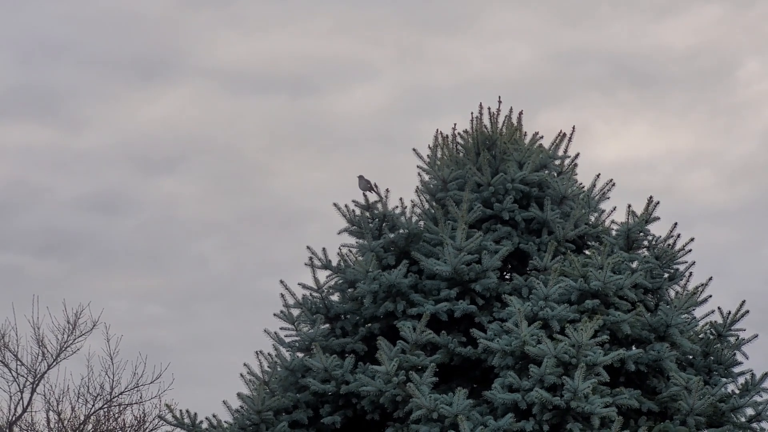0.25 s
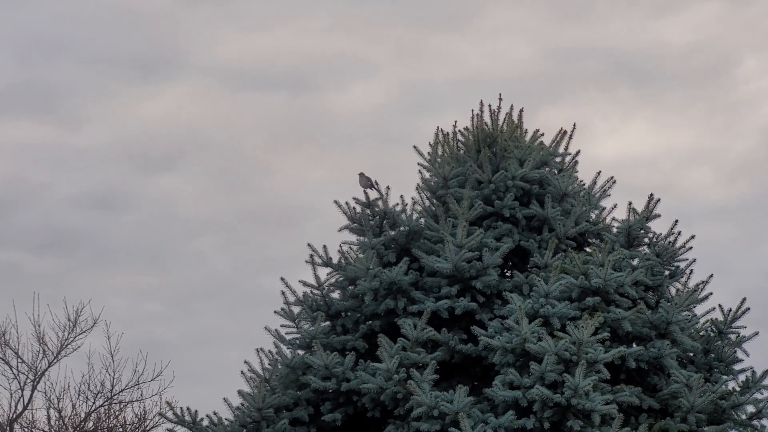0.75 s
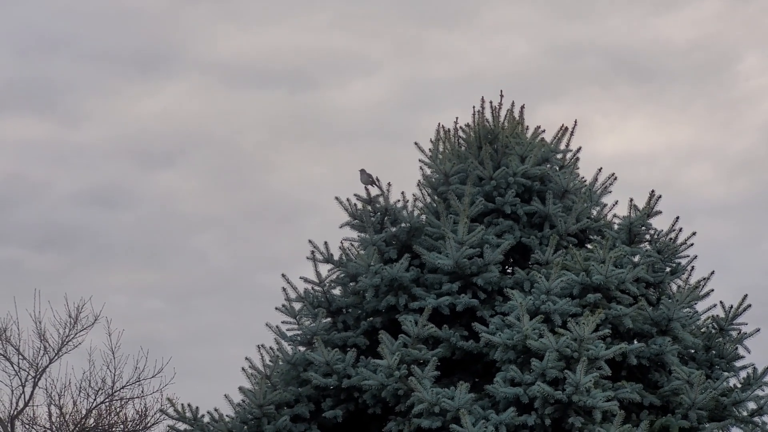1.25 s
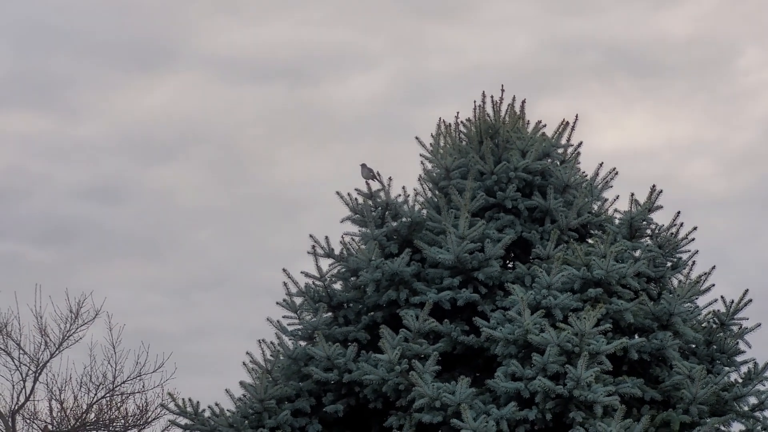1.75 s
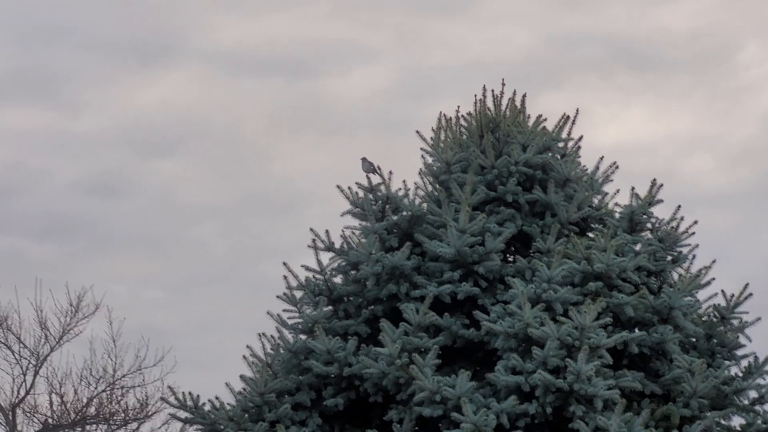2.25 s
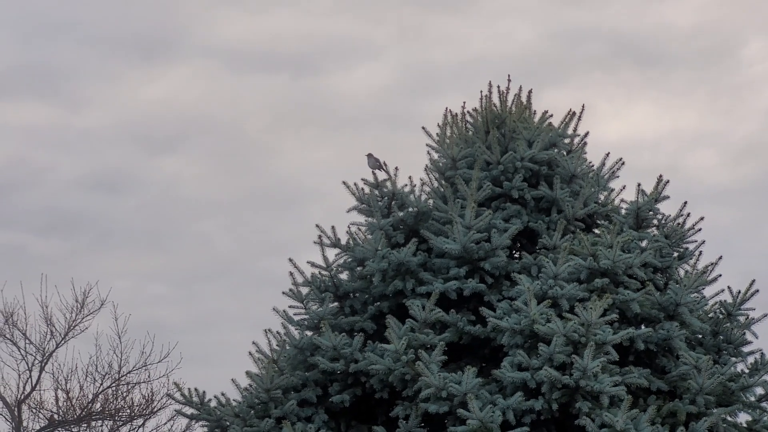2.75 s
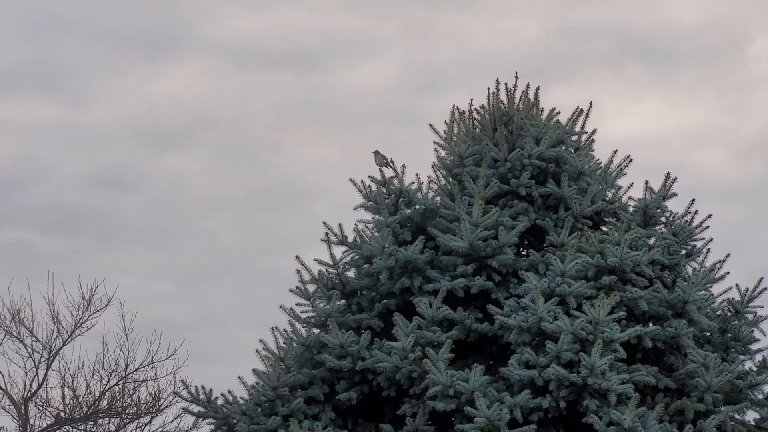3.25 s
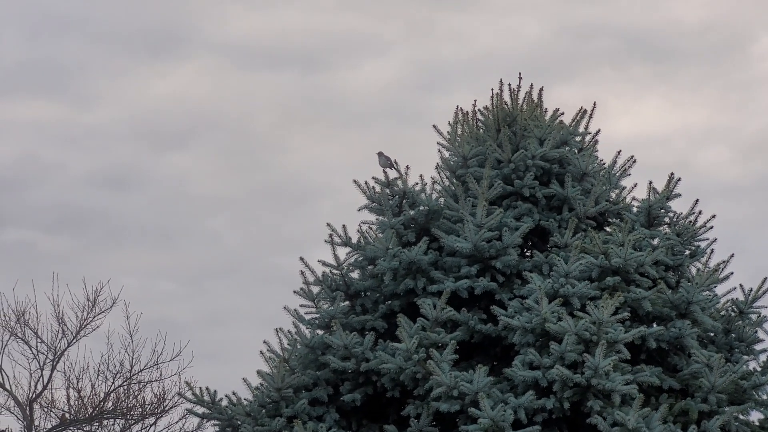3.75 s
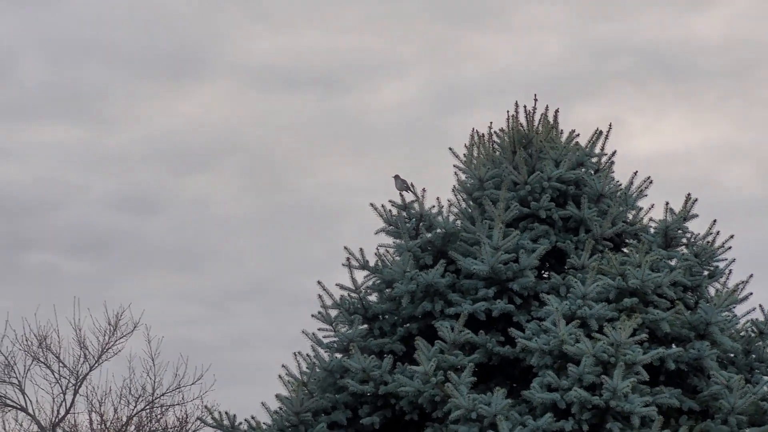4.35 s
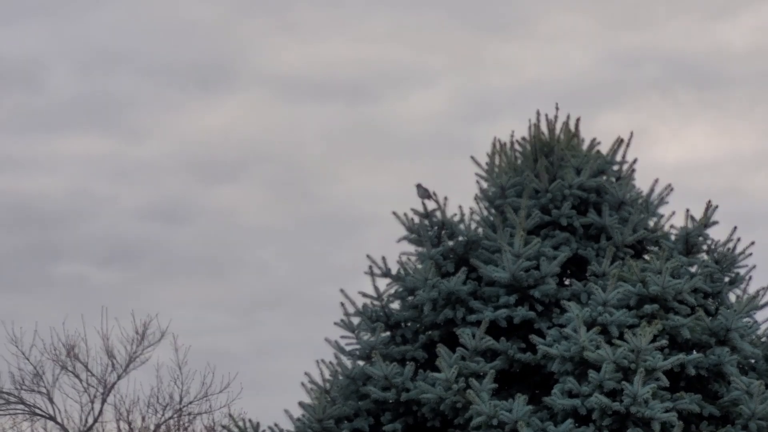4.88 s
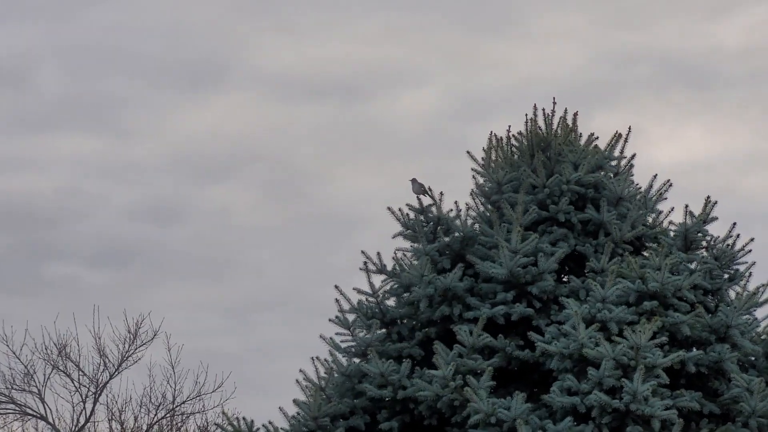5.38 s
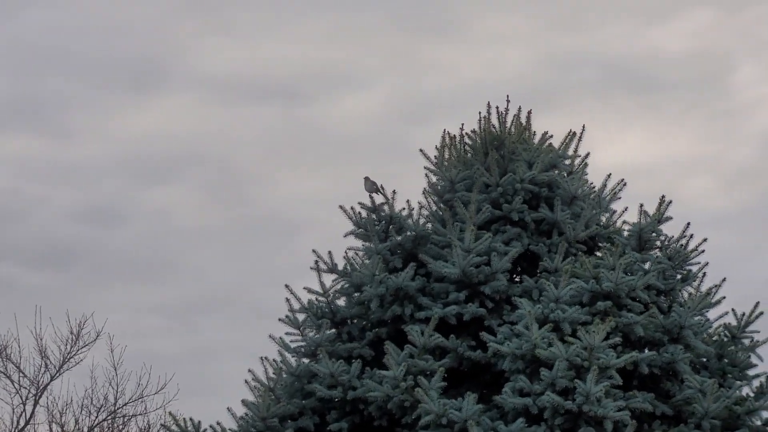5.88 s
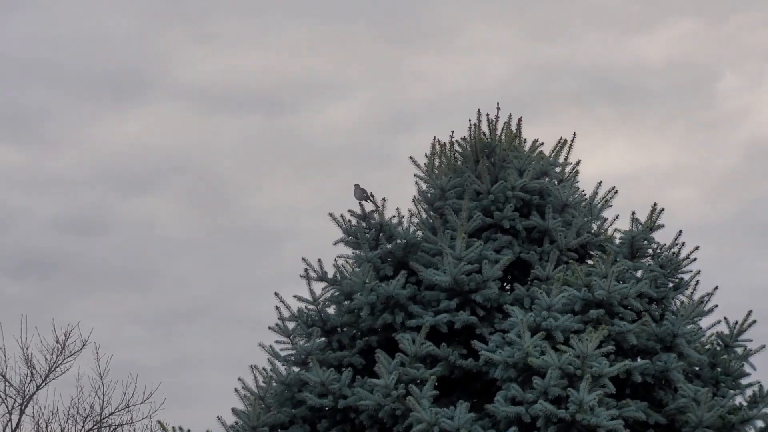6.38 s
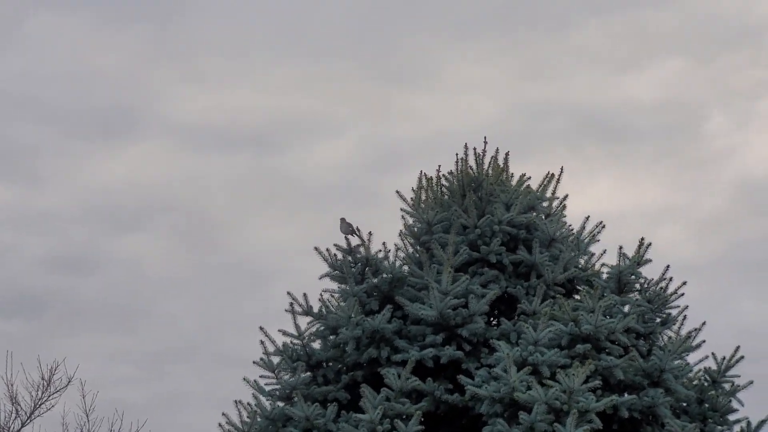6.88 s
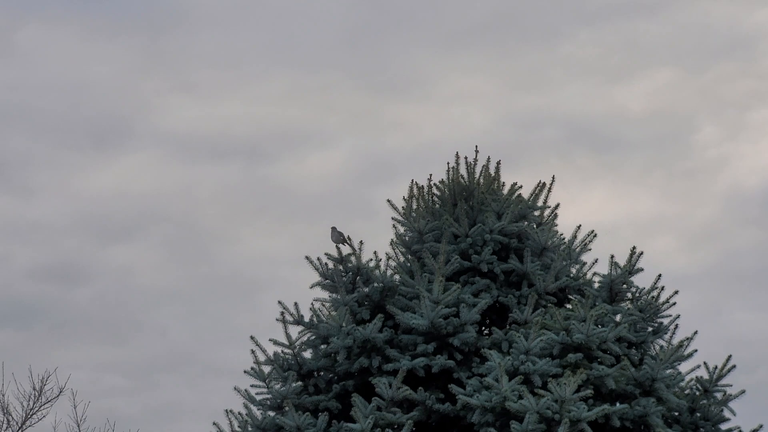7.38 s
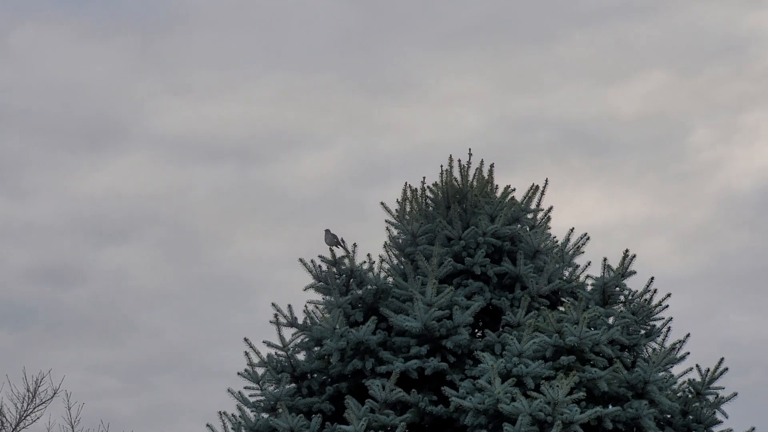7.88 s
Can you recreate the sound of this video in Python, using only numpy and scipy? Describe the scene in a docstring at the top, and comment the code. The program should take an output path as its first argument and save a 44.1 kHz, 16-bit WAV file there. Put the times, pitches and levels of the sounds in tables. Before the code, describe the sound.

Varied chirping phrases from a bird in a tree, with a loud handling thump, faint jacket rustle and low outdoor rumble.

```python
"""First comes a mockingbird's quick warble, then its buzzes, slurred whistles and rising whips.
It sings from a spruce, pushing air through its voice organ, and a far wall throws each note back.
Close by, a hand shifts on the camera with a run of bumps and one loud thump, and a jacket rustles
and ticks as its cloth slides and creases. Smaller birds call faintly over a low outdoor rumble."""
import sys
import numpy as np
from scipy import signal
from scipy.fft import rfft, irfft, next_fast_len
from scipy.io import wavfile
from scipy.ndimage import uniform_filter1d

SR = 44100
rng = np.random.default_rng(int(sys.argv[2]) if len(sys.argv) > 2 else 0)


def pcm_store(signal):
    """Save signal as 16-bit PCM."""
    levels = np.round(np.clip(np.atleast_2d(signal), -1, 1) * 32767)
    wavfile.write(sys.argv[1], SR, levels.astype(np.int16).T)


N = 358533
TIME = np.arange(N) / SR

# Each kind of note has one shape. Its stage runs from about -1 (start) through 0 (turn) to 1 (end).
# (stage [no unit], pitch [Hz], level [dB])
BUZZ_SHAPE = [(-1, 2250, -42), (-.52, 2320, -7), (0, 2125, 0.5), (.65, 2110, -2.5), (1, 1800, -47)]  # sinks as it swells
FLICK_SHAPE = [(-0.92, 2000, -52), (0.2, 2030, 0), (0.59, 2220, -16), (1, 2400, -46)]  # a sharp rise that closes each buzz
WARBLE_SHAPE = [(-1.06, 2380, -48), (-0.63, 2400, -2), (-.42, 2580, -13.5), (-.2, 2370, 2.5),
                (0, 2000, -13.5), (.35, 2430, 1.5), (.65, 2690, -17.5), (1, 2850, -46)]  # dips and springs back
DROP_SHAPE = [(-0.82, 2620, -50), (-0.79, 2370, 0.5), (-0.098, 2350, 0), (0.94, 1900, -48)]  # falls away after each warble
WHISTLE_SHAPE = [(-1, 1990, -45.5), (-0.66, 2050, -3.5), (-0.66, 2085, 1), (.45, 1950, -4),
                 (0.99, 2100, -42)]  # stays near one pitch
SLUR_SHAPE = [(-0.93, 2430, -47), (-0.62, 2420, -8.5), (-.36, 2500, -16.5), (-.22, 2130, -5.5),
              (0, 1700, -18), (.16, 1890, -5), (.29, 2025, 2.5), (.42, 2095, -4.5), (.6, 2085, -0.5),
              (.87, 2005, -3), (0.89, 1800, -48.5)]  # swoops down, then climbs to a held note
WHIP_SHAPE = [(-1, 1800, -52), (-0.71, 2160, -11.5), (-0.6, 2380, -2.5), (-.33, 2555, 0), (0, 2590, 1.5),
              (0.26, 3220, -9.5), (1, 3520, -48)]  # rises in two steps
# When and how the bird sings each shape:
# (time of turn [s], lead-in [s], tail [s], pitch shift [Hz], level [dB])
BUZZES = [(1.055, 0.065, 0.053, 0, -54), (1.315, .075, 0.059, 9, -51.5), (1.585, 0.087, .07, -0.5, -52.5)]
FLICKS = [(1.114, 0.012, .034, 1, -39), (1.379, 0.01, 0.032, 35, -42), (1.664, 0.009, .023, -29.5, -38.5)]
WARBLES = [(.018, 0.072, 0.02, 21.5, -51), (2.431, 0.08, 0.051, 9.5, -51), (2.866, .065, 0.057, -16, -52)]
DROPS = [(.066, 0.017, .055, 60, -64), (2.556, 0.043, .023, -30.5, -50.5), (3.015, .04, .02, 104, -53.5)]
WHISTLES = [(2.645, 0.059, 0.041, -15, -48.5), (3.105, 0.058, 0.027, 17, -50.5)]
SLURS = [(3.628, 0.057, 0.12, 6, -44), (3.916, .055, 0.15, -28, -45.5), (4.258, 0.071, 0.14, 19.5, -46.5),
         (5.009, 0.071, .11, 60, -43.5), (5.291, 0.054, 0.17, -17, -44.5)]
WHIPS = [(7.335, 0.048, 0.018, 0.0078, -50), (7.786, 0.056, 0.022, 0.0064, -52.5)]
# two notes sung only once: (time [s], pitch [Hz], level [dB])
ARCHED_NOTE = [(6.07, 1258, -93), (6.113, 1640, -62.5), (6.124, 2315, -51.5), (6.138, 2305, -41.5),
               (6.16, 2363, -58), (6.21, 2376, -43), (6.25, 2033, -47.5), (6.265, 1554, -62),
               (6.29, 1400, -62), (6.335, 1720, -95)]
ZIGZAG_NOTE = [(6.74, 1630, -82), (6.785, 1537, -70), (6.798, 1990, -59.5), (6.816, 1747, -75),
               (6.839, 1990, -47.5), (6.853, 2155, -71), (6.877, 1910, -52.5), (6.885, 2114, -41),
               (6.894, 2470, -57), (6.903, 3140, -87)]
# moments when the voice turns hoarse: (time [s], length [s], roughness [0-1])
VOICE_BREAKS = [(2.409, 0.032, 0.53), (3.673, 0.056, 0.18), (3.868, 0.03, 0.46), (4.318, 0.15, 0.28),
                (4.972, .11, 0.27), (6.206, 0.075, 0.54), (6.782, 0.081, 0.38), (6.866, 0.066, 0.65),
                (7.331, 0.022, 0.8), (7.782, 0.011, 0.5)]
# how well the throat and beak let overtones through: (frequency [Hz], level [dB])
THROAT_FILTER = [(3500, -58), (4300, -36), (4600, -41.5), (5200, -20.5), (5800, -56.5), (6400, -32.5),
                 (7100, -35), (8000, -43), (10000, -48.5)]
# echoes of the song: (delay [s], left level [dB], right level [dB])
ECHOES = [(.0062, -22.5, -4.5), (.0135, -29, -9), (.022, -31, -38), (.074, -41, -32.5), (.128, -22.5, -13),
          (.205, -37, -28)]

# the hand bumps the camera: (time [s], knock [dB], boom [dB], click [dB], left minus right [dB])
BUMPS = [(1.83, -67, -39, -82, 16), (1.987, -55, -35, -73, 19), (2.012, -40, -24, -54, 5),
         (2.035, -38, -30, -61, 0.5), (2.07, -31.5, -26, -57, 3.5), (2.109, -34.5, -25.5, -52, 11),
         (2.143, -29, -21.5, -56, 1), (2.175, -26.5, -24, -57, 16.5), (2.2215, -3, -15, -20.5, 5.5),
         (2.245, -38, -25.5, -45.5, -13), (2.2641, -26.5, -23.5, -28.5, 15.5),
         (2.282, -7.5, -20.5, -28, 10.5), (2.294, -52, -30, -58, -9), (2.324, -34.5, -34, -52.5, 2),
         (2.381, -37, -38.5, -55, 3), (2.737, -69, -39.5, -80, 8), (3.065, -45, -44.5, -72, 4.5),
         (4.47, -29.5, -37, -47, 8), (4.549, -46, -48, -59, 19), (4.686, -42, -58, -71, 17),
         (5.046, -34, -58, -55, 10), (5.074, -52, -38.5, -75, 3), (5.381, -45, -42, -76, 15),
         (5.556, -68, -79, -50, -1), (5.622, -69, -40.5, -60, 15), (5.675, -54.5, -48, -45.5, -9),
         (5.89, -41.5, -36.5, -51.5, 3), (6.076, -50, -40, -59, -10.5), (6.494, -38, -33, -70, -5),
         (7.036, -44, -39, -76.5, 0), (7.332, -51.5, -45, -75, 8.5), (7.633, -76, -48, -85, -17)]
# the tones the camera case rings at: (frequency [Hz], level [dB], time to fade by 60 dB [s])
KNOCK_TONES = [(330, -6, 0.025), (424, -1.5, 0.018), (541, -3.5, 0.014)]
BOOM_TONES = [(49.04, -6.5, 0.18), (67, 1, 0.067), (113, 2, 0.02), (230, -3, 0.018)]
# the hand rubs the camera: (time [s], length [s], level [dB])
RUBS = [(2.177, 0.16, -62.5), (4.456, 0.054, -65.5), (4.535, 0.069, -65.5), (4.589, 0.16, -66),
        (4.975, 0.14, -67), (5.274, 0.18, -68.5), (6.42, 0.21, -72.5)]
# the hiss of skin rubbing and squeaking on the case: (frequency [Hz], level [dB])
RUB_COLOUR = [(300, -5.5), (700, 3.5), (1600, -3), (2800, -9.5), (4200, -9.5), (5500, -16.5), (7000, -18.5),
              (15000, -22)]
SQUEAK_COLOUR = [(2800, -37), (3700, -4), (4250, 0), (4800, -12), (5600, -37)]

# the jacket ticks: (time [s], level [dB], level change for the tick's lower part [dB])
TICKS = [(0.7037, -50, -1), (1.1544, -62, -14), (1.434, -37, -21), (1.4772, -32, -27), (1.5094, -42.5, -15),
         (1.577, -49, -10), (1.9233, -47, -37), (1.9576, -41.5, -35), (2.219, -61, -9), (2.2639, -45, -16),
         (2.2819, -60, -10.5), (2.7377, -49, -30), (3.063, -44.5, -26), (3.5629, -46, -31),
         (3.7961, -50.5, -5), (3.8586, -48, -1), (3.9422, -37.5, -8.5), (4.0268, -50, 2),
         (4.3028, -46, -24), (5.1817, -29.5, -7.5), (7.3329, -44.5, -2), (7.8266, -45, -39.5),
         (7.8851, -51, -24), (7.999, -45, -31)]
# the sleeve slides and its creases crumple: (middle time [s], length [s], level [dB])
SLIDES = [(.02, 0.17, -68), (.3, 0.1, -69), (.385, .04, -69), (.52, 0.13, -67.5), (.75, 0.08, -67.5),
          (.97, 0.054, -67.5), (1.24, 0.14, -73), (1.48, 0.23, -69), (2.29, 0.11, -77), (3.46, 0.2, -66),
          (3.7, 0.1, -70), (3.955, 0.064, -62.5), (5.06, 0.1, -75), (5.2, 0.045, -68.5), (6.53, 0.26, -66)]
CRUMPLES = [(.07, 0.2, -63.5), (.285, 0.066, -62.5), (.38, 0.047, -69), (.54, 0.14, -65),
            (.735, 0.096, -59), (.96, 0.043, -56), (1.055, 0.065, -66), (1.215, 0.086, -60),
            (1.8, .035, -60), (2.175, .04, -64), (2.29, 0.072, -66), (2.41, 0.11, -65.5),
            (2.63, 0.039, -61.5), (2.755, 0.039, -61.5), (2.97, 0.055, -60.5), (3.06, 0.015, -54),
            (3.28, .035, -63.5), (3.665, 0.065, -63.5), (4.71, 0.053, -69.5), (5.035, 0.1, -66),
            (5.395, 0.09, -66.5), (5.885, 0.061, -70), (6.06, .05, -69), (6.185, 0.067, -70),
            (6.9, 0.19, -72.5), (7.04, 0.064, -58.5), (7.56, 0.18, -67.5), (7.745, 0.075, -67)]
# the cloth barely stirs between strokes: (time [s], sliding [dB], crinkling [dB])
STIRRING = [(0, -77.5, -82), (1.4, -78.5, -70), (2.5, -80.5, -79), (4.3, -85, -79), (6.3, -83, -83),
            (8.13, -91, -82)]
# the hiss of sliding and of crinkling cloth: (frequency [Hz], level [dB])
SLIDE_COLOUR = [(3000, -31), (4500, -24), (5400, -17.5), (6000, -17), (7100, -3), (8600, -15), (10500, -7),
                (12300, -0.5), (14000, -7), (15700, -4.5)]
CRINKLE_COLOUR = [(4000, -38), (7500, -13.5), (8800, -22.5), (10500, -9.5), (12500, 1), (14200, -1.5),
                  (16000, -4.5)]

# thin calls of far birds:
# (time [s], length [s], start pitch [Hz], end pitch [Hz], level [dB], left minus right [dB])
FAR_CALLS = [(1.591, 0.063, 4134, 3470, -67, 6.5), (1.627, 0.066, 3605, 2720, -70.5, 4),
             (1.785, .03, 2050, 2180, -87, -22), (1.999, 0.064, 1665, 1860, -76.5, -5.5),
             (2.29, 0.05, 1870, 1740, -72.5, -5), (5.805, 0.094, 5430, 5680, -86, 15)]
# a far bird's trill: (time [s], level [dB])
TRILL_LEVEL = [(3.92, -86), (4.25, -90), (4.5, -81), (4.75, -80), (5.0, -94)]
# a far bird's hoarse calls: (time [s], length [s], level [dB])
RASPS = [(0.095, 0.072, -66.5), (0.341, 0.047, -73), (0.573, 0.061, -77), (1.797, 0.15, -75.5),
         (2.602, 0.049, -68.5)]
# the breathy noise in those calls: (frequency [Hz], level [dB])
RASP_COLOUR = [(700, -20), (1050, 3.5), (1500, -0.5), (1850, 0), (2450, 3.5), (3100, -19), (5000, -21)]

# the low rumble swells and sinks: (time [s], level [dB])
RUMBLE_LEVEL = [(0, -62.5), (.7, -67), (1.9, -58.5), (2.45, -61.5), (3.3, -67), (3.44, -74), (3.7, -66),
                (4.2, -58), (4.5, -51.5), (5.0, -54.5), (5.45, -64), (6.55, -66), (7.04, -54.5),
                (7.25, -63.5), (7.6, -60), (8.13, -78)]
# the four background noises: (frequency [Hz], level [dB])
RUMBLE_COLOUR = [(15, -45), (25, -8.5), (49, -5), (91, -4.5), (227, 2), (291, -8.5), (372, -5), (539, -23),
                 (639, -27.5), (844, -33.5), (1000, -38.5), (1300, -57), (2200, -120)]
HUM_COLOUR = [(350, -71), (385, -11), (397, 0), (410, -18.5), (450, -73.5)]
BREEZE_COLOUR = [(20, -20.5), (35, -4), (55, 2.5), (100, -13), (300, -39.5), (1000, -79)]
AIR_COLOUR = [(500, 11.5), (1000, 4), (2000, 5), (3000, -0.5), (5000, -4.5), (8500, -6), (12000, -1.5),
              (16000, -7)]


def mockingbird():
    """The bird sings from one perch. Returns the song in stereo, and in mono to feed the echoes."""
    song = voice(notes(FLICK_SHAPE, FLICKS), waver=.0027, overtone_db=-7) + buzz()
    warbled = notes(WARBLE_SHAPE, WARBLES) + notes(DROP_SHAPE, DROPS) + notes(WHISTLE_SHAPE, WHISTLES)
    song += voice(sorted(warbled), waver=.0085, overtone_db=0)
    song += voice(notes(SLUR_SHAPE, SLURS), waver=.0084, overtone_db=-1, flutter_db=0)
    song += voice(ARCHED_NOTE + ZIGZAG_NOTE, waver=.012, overtone_db=-3)
    bright_db = np.interp(TIME, [7.35, 7.7], [3, 13])  # the second whip is brighter
    whips = voice(notes(WHIP_SHAPE, WHIPS), waver=.011, overtone_db=bright_db)
    direct = from_db(-1.5) * at_microphones(song, balance_db=-9, lag_s=.000023)
    direct += from_db(1.5) * at_microphones(whips, balance_db=-8, lag_s=.000098)
    return direct, song + whips


def voice(phrase, waver, overtone_db, flutter_db=2, sweep=0, gate=.68):
    """The voice organ makes a nearly pure, gliding whistle, but only when air pushes hard enough."""
    times, hz, db = np.transpose(phrase)
    curves = in_time(np.transpose([times, hz, from_db(db)]))
    pitch, pressure = [uniform_filter1d(curve, size=180) for curve in curves]  # round the corners
    pressure = np.maximum(pressure - from_db(-83), 0)
    rough = sum(amount * swell(start, length) for start, length, amount in VOICE_BREAKS)
    pitch *= 1 + waver * drift(250) + sweep + .1 * rough * drift(480)
    strength_db = flutter_db * drift(120) + 4.5 * rough * drift(350)
    phase = phase_of(pitch)
    tone = np.sin(phase)
    for k in (2, 3):  # overtones are less steady than the main tone
        level_db = np.interp(k * pitch, *np.transpose(THROAT_FILTER)) + overtone_db + 3 * drift(90)
        tone += from_db(level_db) * np.sin(k * phase + 1.5 * drift(490))
    return np.sqrt(2) * pressure * gate * from_db(strength_db) * tone


def buzz(pulse_hz=86.7):
    """The whistle is chopped into fast, slightly uneven pulses, each sliding upward."""
    beat = 2 * np.pi * pulse_hz * TIME + .6 * drift(50)
    sweep = .05 * np.sin(beat) + .046 * drift(450)
    return voice(notes(BUZZ_SHAPE, BUZZES), waver=.0049, overtone_db=-2.5, flutter_db=0,
                 sweep=sweep, gate=rms_one(1.25 + np.cos(beat)))


def notes(shape, rows):
    """Repeat one note shape, each time with its own length, pitch and level."""
    return [(turn + stage * (lead if stage < 0 else tail), hz + shift_hz, db + level_db)
            for turn, lead, tail, shift_hz, level_db in rows for stage, hz, db in shape]


def echoes(song):
    """The ground and far walls send back late, duller copies of the song."""
    dull = butter(song, 2600, "low")
    return sum(from_db([[left], [right]]) * delayed(dull, lag_s) for lag_s, left, right in ECHOES)


def garden_scatter(x, level_db, fade_s):
    """Twigs and walls scatter a sound into a thin, dull tail."""
    age = TIME[:SR]
    tail = butter(rng.standard_normal((2, SR)), 4500, "low")
    tail *= from_db(-60 * age / fade_s) * (1 - np.exp(-age / .011))
    tail /= np.sqrt(np.sum(tail ** 2, axis=1, keepdims=True))
    return from_db(level_db) * signal.fftconvolve(np.atleast_2d(x), tail, axes=1)[:, :N]


def hand_bumps(muffle_hz=740):
    """Soft blows make the camera case ring; hard ones click and crack too, and the skin rubs."""
    times, knock_db, boom_db, click_db, balance = np.transpose(BUMPS)
    # a blow rocks the case, so the right side booms opposite to the left, and slightly later
    booms = clicks_at(times - .001, boom_db + 4, .61 * balance - 2)
    booms[1] = -delayed(booms[1], .0016)
    body = ringing_case(booms, BOOM_TONES)
    # a harder blow is a stiffer contact, which favours the higher tones
    db_per_octave = np.clip(2 * (knock_db + 4.5), -6, 7)
    for k, (hz, db, fade_s) in enumerate(KNOCK_TONES):
        level_db = knock_db + db + db_per_octave * np.log2(hz / 420)
        pushes = clicks_at(times - .0025, level_db, balance)  # just before the click
        body += (-1) ** k * ring(pushes, hz, fade_s)
    # each blow drags the skin a little way across the case
    drag = puffs(clicks_at(times, np.minimum(knock_db, -22), balance), fade_s=.13)
    body = butter(body + butter(drag, [70, 480], "band"), muffle_hz, "low", order=5)
    body[1] = delayed(body[1], .0003)
    click = butter(puffs(clicks_at(times, click_db + 7.5, balance), .0075), 610, "low", order=1)
    rub = noise(RUB_COLOUR, alike=.1) * from_db(.77 * drift(340)) * swells(RUBS)
    crack = butter(puffs(clicks_at(times, click_db + 6.5, balance), .012), [950, 1500], "band")
    return body + click + crack + rub


def slipping_grip(slips_per_s=170):
    """Skin sticks and slips around the thump, tapping the case at random; later it squeaks once."""
    slips = (rng.random((2, N)) < slips_per_s / SR) * rng.standard_normal((2, N))
    slips *= swell(start=1.99, length=.41) * from_db(-37.5)
    flutter = ringing_case(slips, BOOM_TONES[2:] + KNOCK_TONES)
    squeak = noise(SQUEAK_COLOUR, alike=.097) * swell(start=6.475, length=.062) * from_db(-71)
    return butter(flutter, 620, "low", order=3) + squeak


def ringing_case(taps, tones):
    """Each tap sets several tones of the case ringing, every second one flipped over."""
    return sum((-1) ** k * from_db(db) * ring(taps, hz, fade_s)
               for k, (hz, db, fade_s) in enumerate(tones))


def jacket(catches_per_s=80):
    """Cloth slides with a soft hiss, and its creases crinkle and snap near the left microphone."""
    sliding_db, crinkling_db = in_time(STIRRING)
    slide = noise(SLIDE_COLOUR) * strokes(SLIDES, sliding_db) * from_db(-1 + 1.5 * drift(200))
    # a short crinkle goes with every tick
    flurries = [(time + .008, .032, min(db - 18.5, -65.5)) for time, db, _ in TICKS]
    crumpling = strokes(CRUMPLES + flurries, crinkling_db + 4.5 * drift(20))
    # fibres catch and let go at random, which makes the hiss gritty
    catches = (rng.random(N) < catches_per_s / SR) * from_db(5 * np.minimum(rng.exponential(1, N), 4))
    grit = rms_one(from_db(1.5) + 2 * die_away(catches, fade_s=.053))
    crinkle = noise(CRINKLE_COLOUR) * crumpling * grit * from_db([[3.5], [-16.5]])
    times, tick_db, lower_db = np.transpose(TICKS)
    top = puffs(clicks_at(times, tick_db + 2.5, balance_db=11), fade_s=.0031)
    lower = puffs(clicks_at(times, tick_db + lower_db - 9.5, balance_db=10), fade_s=.015)
    return slide + crinkle + butter(top, 10500, "high") + butter(lower, [4000, 8000], "band")


def far_birds(low_hz=4850, high_hz=5420, trills_per_s=13.4):
    """Small birds give hoarse rasps, thin glides and a blurred trill that swings between two pitches."""
    calls = from_db(1) * noise(RASP_COLOUR, alike=.12) * swells(RASPS)
    wobble = 1 + .025 * drift(490)
    for start, length, start_hz, end_hz, db, balance in FAR_CALLS:
        pitch = np.interp(TIME, [start, start + length], [start_hz, end_hz]) * wobble
        glide = np.sqrt(2) * from_db(db) * swell(start, length) * np.sin(phase_of(pitch))
        calls += panned(glide, balance)
    cycle = (TIME - 4.275) * trills_per_s % 1  # first half high, second half low and softer
    pitch = np.where(cycle < .5, high_hz + 400 * (cycle - .25), low_hz - 600 * (cycle - .75))
    pulses = np.sqrt(np.abs(np.sin(2 * np.pi * cycle))) * np.where(cycle < .5, .7, .35)
    level = from_db(np.interp(TIME, *np.transpose(TRILL_LEVEL), left=-140, right=-140))
    trill = np.sqrt(2) * level * pulses * np.sin(phase_of(pitch * wobble))
    return calls + panned(trill, balance_db=-13.5)


def outdoors():
    """A lumpy low rumble, a far hum and a light breeze lie under a faint, even hiss of air."""
    level_db, = in_time(RUMBLE_LEVEL)
    rumble = butter(noise(RUMBLE_COLOUR, alike=.66), 590, "low", order=4)
    rumble *= from_db(level_db + 2 + .1 * drift(25))
    hum = noise(HUM_COLOUR, alike=.23) * from_db(-82)
    breeze = noise(BREEZE_COLOUR, alike=.4) * from_db(-73.5 + 2.9 * drift(7.9))
    air = noise(AIR_COLOUR, alike=.019) * from_db(-79.5)
    return rumble + hum + breeze + air


def from_db(db):
    """Turn decibels into a number to multiply by."""
    return 10 ** (np.asarray(db) / 20)


def rms_one(x):
    """Scale a signal so its average strength (rms) is 1."""
    return x / np.sqrt(np.mean(x ** 2) + 1e-20)


def in_time(rows):
    """Join a table's points with straight lines: one curve for each column after the time."""
    times, *columns = np.transpose(rows)
    return [np.interp(TIME, np.sort(times), column) for column in columns]


def panned(x, balance_db):
    """Make the left side louder than the right by balance_db."""
    return x * from_db(np.array([[.5], [-.5]]) * balance_db)


def delayed(x, lag_s):
    """The same sound, lag_s seconds later."""
    return np.interp(TIME - lag_s, TIME, x)


def at_microphones(x, balance_db, lag_s):
    """One sound reaches two microphones, the right one a little later."""
    return panned(np.array([x, delayed(x, lag_s)]), balance_db)


def butter(x, hz, kind, order=2):
    """A filter that keeps the lows, the highs or a band between."""
    return signal.sosfilt(signal.butter(order, hz, kind, fs=SR, output="sos"), x + 1e-18)


def drift(rate):
    """A random wander around zero, heading for a new value rate times a second."""
    points = rng.standard_normal(4096)
    return np.interp(TIME * rate, np.arange(len(points)), points)


def swell(start, length):
    """A rounded rise and fall."""
    return np.sin(np.pi * np.clip((TIME - start) / length, 0, 1))


def swells(rows):
    """Several rises and falls, each at its own level."""
    return sum(from_db(db) * swell(start, length) for start, length, db in rows)


def strokes(rows, rest_db):
    """The loudness of bell-shaped movements, added on top of a resting level."""
    coarse = TIME[::32]
    power = sum(from_db(db) ** 2 * np.exp(-2 * np.minimum((2 * (coarse - middle) / length) ** 2, 20))
                for middle, length, db in rows)
    return np.sqrt(np.interp(TIME, coarse, power) + from_db(rest_db) ** 2)


def noise(colour, alike=0):
    """Stereo noise: colour sets its mix of lows and highs, alike (0-1) how well the sides match."""
    size = next_fast_len(N)
    hz, db = np.transpose(colour)
    bin_hz = np.arange(size // 2 + 1) * SR / size
    gain = from_db(np.interp(np.log(bin_hz + 1), np.log(hz), db))
    mid, side = irfft(rfft(rng.standard_normal((2, size))) * gain, size)[:, :N]
    return rms_one(np.sqrt(1 + alike) * mid + np.sqrt(1 - alike) * side * [[1], [-1]])


def clicks_at(times, db, balance_db):
    """Single stereo clicks at the given times."""
    clicks = np.zeros((2, N))
    clicks[:, np.round(times * SR).astype(int)] = panned(from_db(db), balance_db)
    return clicks


def ring(clicks, hz, fade_s):
    """Each click starts a pure tone that fades by 60 dB in fade_s seconds."""
    decay, step = from_db(-60 / (fade_s * SR)), 2 * np.pi * hz / SR
    return signal.lfilter([0, np.sin(step)], [1, -2 * decay * np.cos(step), decay ** 2], clicks + 1e-18)


def die_away(clicks, fade_s):
    """Give each click a tail that fades by 60 dB in fade_s seconds."""
    return signal.lfilter([1], [1, -from_db(-60 / (fade_s * SR))], clicks + 1e-18)


def puffs(clicks, fade_s):
    """Each click becomes a fading puff of noise."""
    return die_away(clicks, fade_s) * rng.standard_normal((2, N))


def phase_of(hz):
    """How far a wave has turned, in radians, as its pitch moves."""
    return 2 * np.pi * np.cumsum(hz) / SR


def scene():
    """Add up the birds with their echoes, the background, the hand and the jacket."""
    direct, song = mockingbird()
    far = far_birds()
    birds = direct + echoes(song) + garden_scatter(song, level_db=-22.5, fade_s=.55)
    birds += far + garden_scatter(far, level_db=-8.5, fade_s=.196)
    return birds + outdoors() + hand_bumps() + slipping_grip() + jacket()


def record(dry, low_hz=30, high_hz=15900):
    """Cut away the deepest bass and the highest treble."""
    treble_cut = signal.ellip(10, .2, 70, high_hz, fs=SR, output="sos")
    return signal.sosfilt(treble_cut, butter(dry, low_hz, "high"))


dry = scene()
out = record(dry)
pcm_store(out)
```